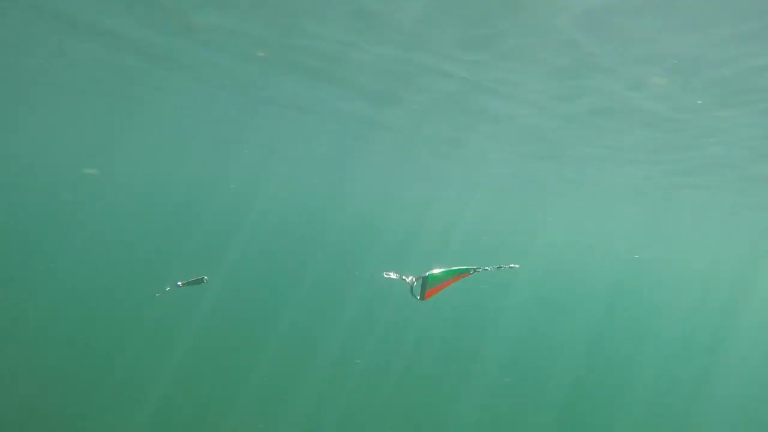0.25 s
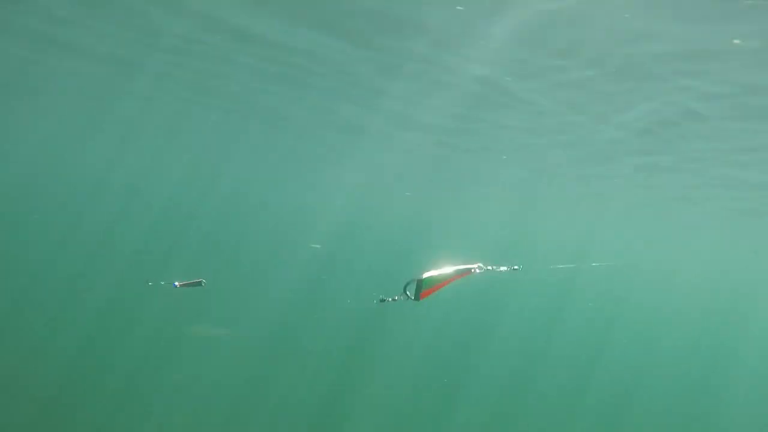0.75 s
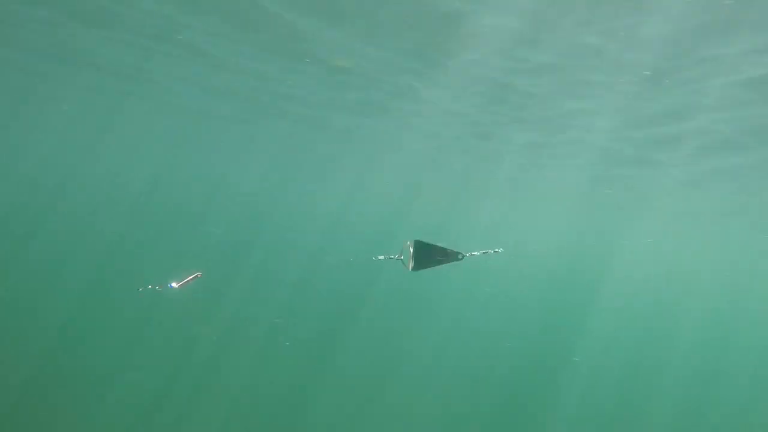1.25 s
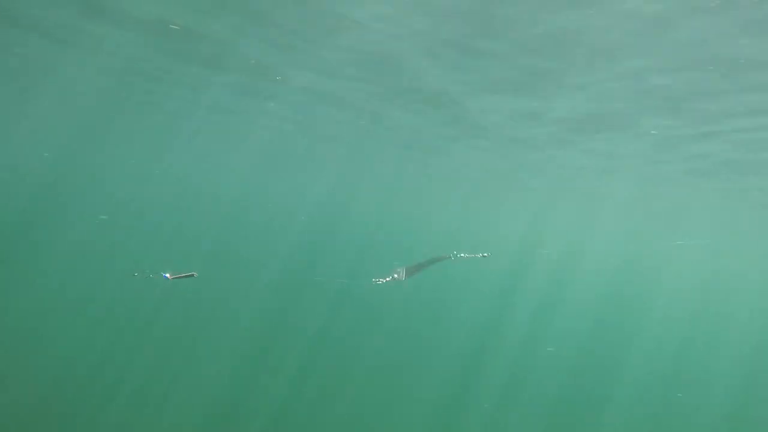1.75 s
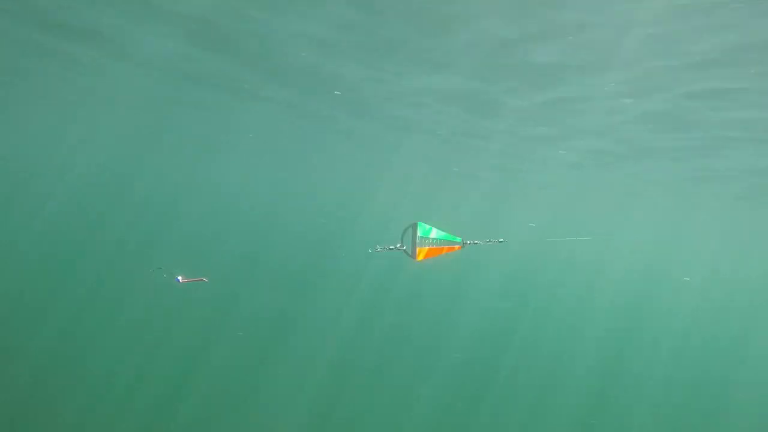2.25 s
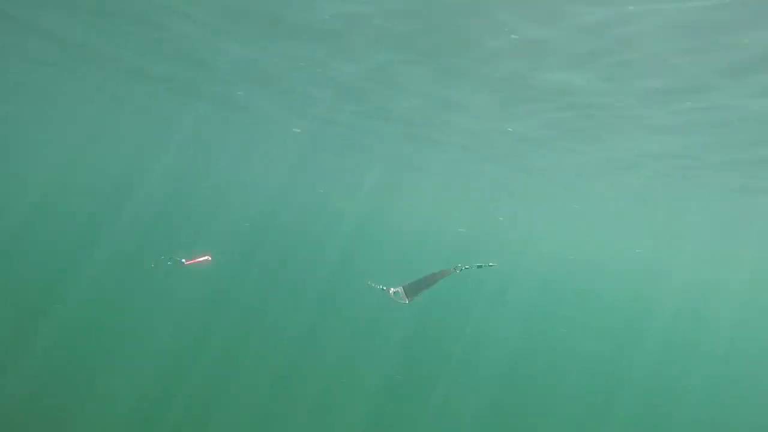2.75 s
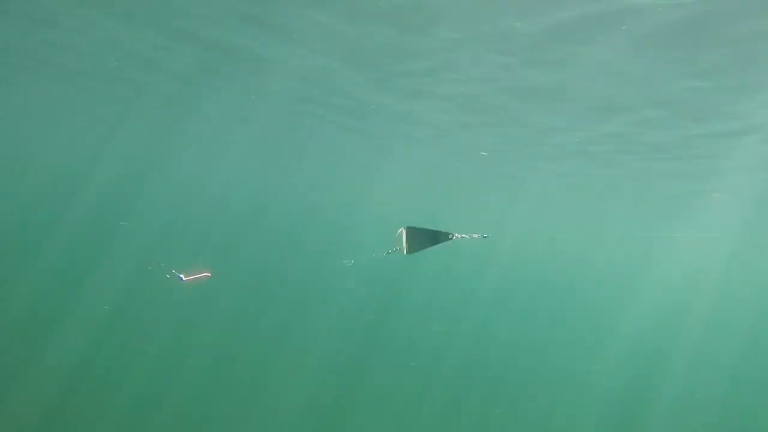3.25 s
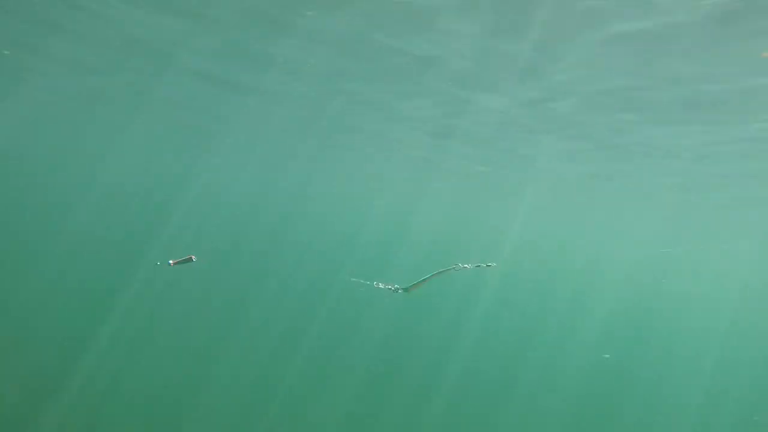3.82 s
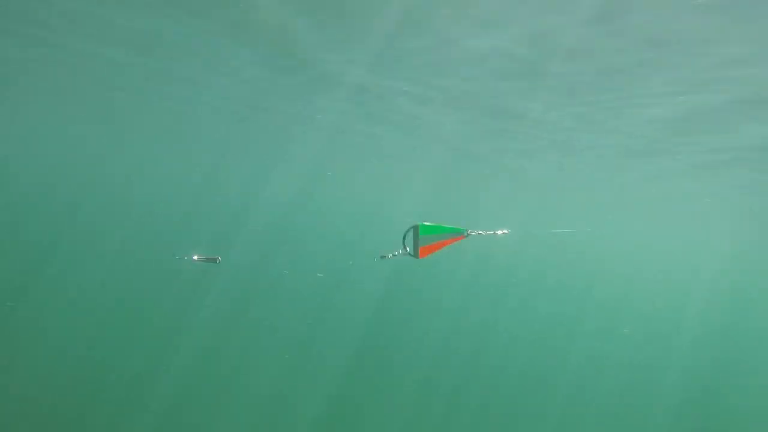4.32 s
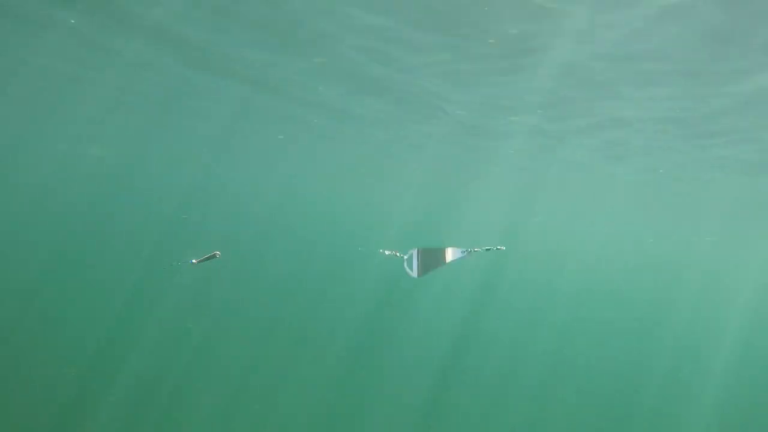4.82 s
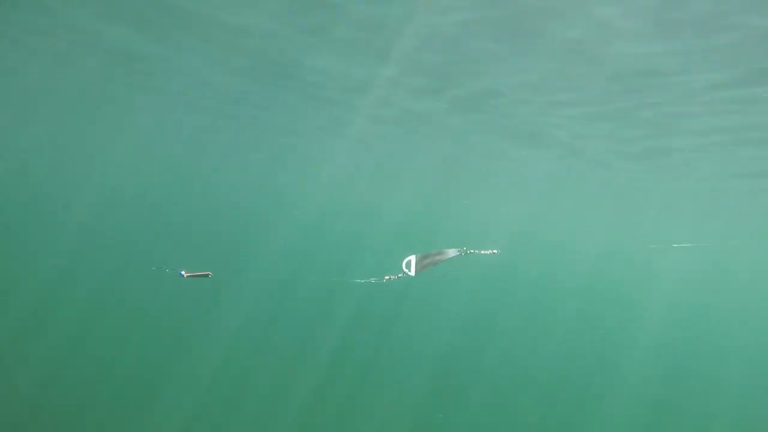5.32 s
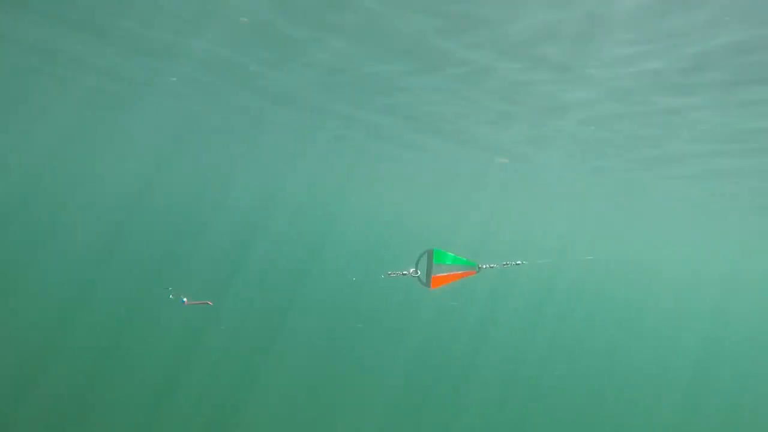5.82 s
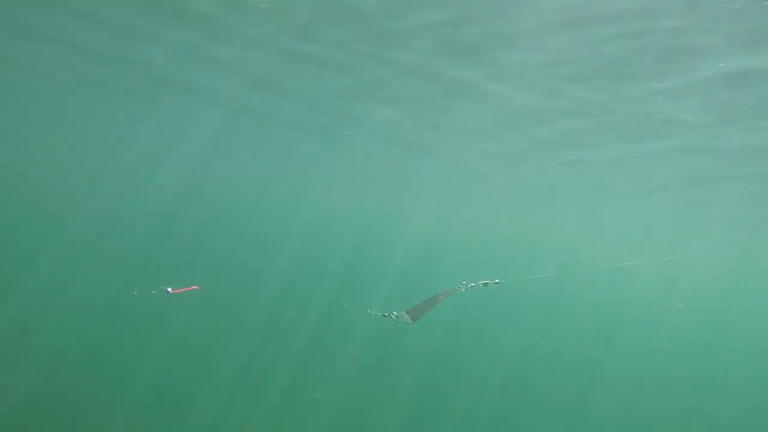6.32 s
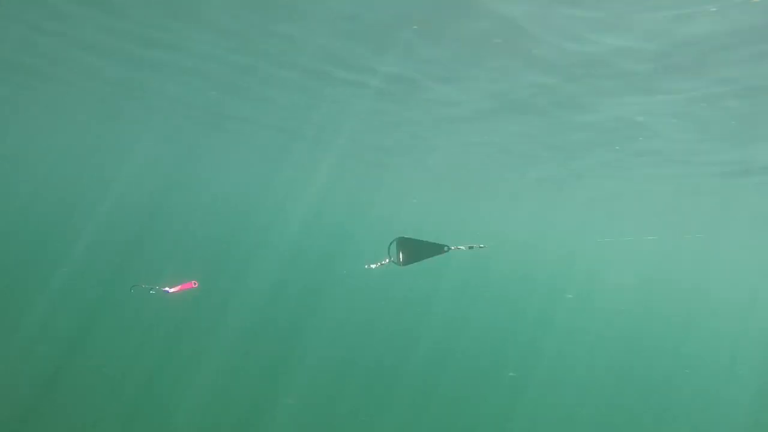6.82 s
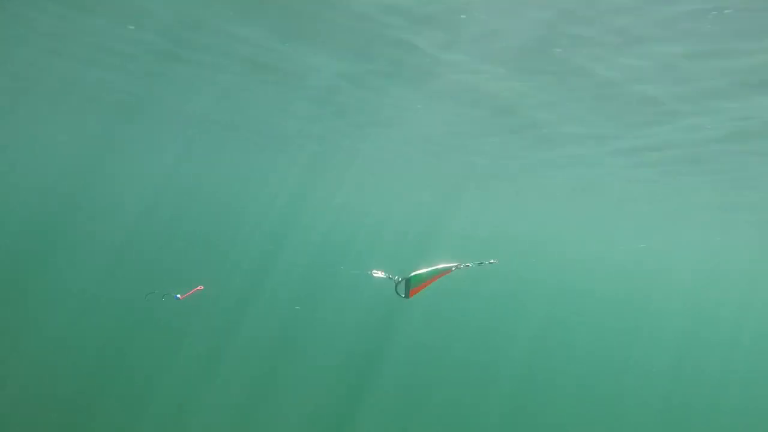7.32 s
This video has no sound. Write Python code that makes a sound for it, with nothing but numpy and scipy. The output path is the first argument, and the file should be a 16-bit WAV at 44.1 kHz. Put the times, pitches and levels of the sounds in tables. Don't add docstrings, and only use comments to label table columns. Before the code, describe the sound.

Heard underwater, a towed lure rig rumbles and thuds through the water while bubbles ring, gurgle and tick around a sealed camera case.

```python
import sys
import numpy as np
from scipy import signal
from scipy.fft import rfft
from scipy.io import wavfile
from scipy.ndimage import uniform_filter1d

SR = 44100
rng = np.random.default_rng(int(sys.argv[2]) if len(sys.argv) > 2 else 0)


def generate_wav(sig):
    pcm = np.round(np.clip(np.atleast_2d(sig).T, -1, 1) * 32767).astype(np.int16)
    wavfile.write(sys.argv[1], SR, pcm)


def ratio_of_db(decibels):
    return 10 ** (np.asarray(decibels, float) / 20)


N = 333837
TIME = np.arange(N) / SR

# (time [s], peak level [dB], pitch [Hz])
JERKS = [(0.247, -10.5, 199), (0.388, -10.5, 110.6), (0.44, -6, 171), (0.581, -14, 164),
         (0.751, -15, 134.5), (0.9, -7.5, 157), (0.928, -1.5, 124), (1.135, -9.5, 163), (1.326, -10.5, 123),
         (1.391, -14.5, 175), (1.49, -6.5, 113), (1.97, -6, 172), (2.101, -22, 73), (2.105, -2, 194),
         (2.728, -16, 113), (2.83, -11, 187), (2.881, -11, 193), (3.562, -10.5, 142.6), (3.791, -10.5, 132),
         (3.909, -10.5, 185), (3.96, -12, 180), (4.0, -12, 160), (0.06, -13, 190), (6.45, -13, 110),
         (4.174, -2.5, 127), (4.253, 0, 122), (4.999, -4, 102.3), (5.313, -10, 100), (5.452, -2.5, 150.1),
         (5.48, 1, 173.3), (6.068, -14, 113), (6.203, -12, 124.5), (6.641, -10, 139), (6.898, -12.5, 116),
         (0.33, -14, 120), (1.203, -8, 118.3), (1.714, -15, 113), (1.861, -19, 100), (2.339, -25, 138),
         (2.451, -8.5, 174), (2.539, -12, 161), (3.331, -12, 151.4), (4.682, -15.5, 197), (6.004, -14, 167),
         (6.255, -15.5, 112), (6.325, -17, 174), (6.56, -15.5, 155), (6.69, -8, 150), (6.982, -11.5, 169),
         (7.285, -13.5, 174), (7.352, -19, 108)]
# (pitch [Hz], width [Hz], level [dB])
SHELL = [(340.5, 35, 6.5), (474.7, 53, -1.5), (590, 170, -19), (797, 47, -6.5), (1008, 213, -3),
         (1314, 250, -1), (1523, 189, -2), (1887, 159, -5.5), (2150, 139, -5.5), (2422, 157, -5),
         (3420, 450, -25), (3830, 304, -22.5), (5220, 400, -25.5), (7050, 2800, -29.5), (10700, 33000, -35)]
# (time [s], level [dB])
FAR = [
    (0.0, -77.5),
    (0.82, -75),
    (1.75, -76),
    (4.24, -75),
    (4.321, -81),
    (4.45, -85),
    (5.2, -76),
    (7.57, -75),
]


def rms_one(x):
    return x / np.sqrt(np.mean(x ** 2) + 1e-20)


def in_time(rows):
    s, *columns = np.transpose(rows)
    return [np.interp(TIME, s, column) for column in columns]


def drift(rate_hz):
    r = np.exp(-80 * np.pi * rate_hz / SR)
    noise = rng.standard_normal(N // 40 + 2002)
    slow = signal.lfilter([1], [1, -2 * r, r * r], noise)[2000:]
    return np.interp(np.arange(N) / 40, np.arange(len(slow)), rms_one(slow - slow.mean()))


def band(x, low_hz, high_hz):
    return signal.sosfilt(signal.butter(2, [low_hz, high_hz], "band", fs=SR, output="sos"), x)


def resonance(hz, width_hz):
    r = np.exp(-np.pi * width_hz / SR)
    return (1 - r * r) / 2 * np.array([1, 0, -1]), [1, -2 * r * np.cos(2 * np.pi * hz / SR), r * r]


def body(x, modes):
    out = 0
    for k, (hz, width_hz, db) in enumerate(modes):
        out = out + (-1) ** k * ratio_of_db(db) * signal.lfilter(*resonance(hz, width_hz), x)
    return out


def shell_gain(hz):
    click = np.zeros(4096)
    click[0] = 1
    power = uniform_filter1d(np.abs(rfft(body(click, SHELL))) ** 2, size=15)
    return np.sqrt(np.interp(hz, np.arange(len(power)) * SR / 4096, power))


def add_ring(out, s, height, hz, t60_s, rise_cycles, glide):
    t = np.arange(int((t60_s + rise_cycles / hz) * SR)) / SR
    shape = (1 - np.exp(-t * hz / rise_cycles)) ** 2 * ratio_of_db(-60 * t / t60_s)
    wave = shape / shape.max() * np.sin(2 * np.pi * hz * t * (1 + glide * t / t60_s))
    i = int(s * SR)
    out[i:i + len(t)] += height * wave[:N - i]


def dying_noise(events, t60_s):
    kicks = np.zeros(N)
    np.add.at(kicks, [int(row[0] * SR) for row in events], ratio_of_db(2 * np.array(events)[:, 1]))
    power = signal.lfilter([1], [1, -ratio_of_db(-120 / (t60_s * SR))], kicks)
    return np.sqrt(power) * rng.standard_normal(N)


def crowd(per_s, spread_db, low_hz, high_hz, width, clumps, count):
    sizes = ratio_of_db(spread_db * np.minimum(rng.exponential(1, N), 4)) * rng.choice([-1, 1], N)
    born = rng.random(N) < per_s * clumps / SR
    dealt = rng.integers(0, count, N)
    rings = 0
    for k, hz in enumerate(np.geomspace(low_hz, high_hz, count)):
        struck = sizes * born * (dealt == k) + 1e-18
        soft = signal.lfilter(*resonance(hz, 0.12 * hz), struck)
        rings = rings + signal.lfilter(*resonance(hz, width * hz), soft) / hz ** .5
    return rms_one(rings)


def swells(events, calm_db, rise_db_s, fall_db_s):
    power = ratio_of_db(2 * calm_db)
    for s, peak_db in events:
        below_db = np.maximum(rise_db_s * (s - TIME), fall_db_s * (TIME - s))
        power = power + ratio_of_db(2 * (peak_db - below_db))
    return 10 * np.log10(power)


def far_hiss(level_db):
    # (pitch [Hz], density [dB per Hz])
    spectrum = [(2500, -4.5), (3200, -14), (4200, -16), (5200, -11), (6500, -18), (9000, -15), (12500, -22),
                (15200, -20)]
    hz, db = np.transpose(spectrum)
    edges_hz = 2500 * 2 ** np.arange(0, 2.8, 1 / 3)
    white = rng.standard_normal((2, N))
    out = np.zeros(N)
    for k, (low_hz, high_hz) in enumerate(zip(edges_hz, edges_hz[1:])):
        band_db = np.interp(np.log(low_hz * high_hz) / 2, np.log(hz), db) + 1.2 * drift(8)
        out += ratio_of_db(band_db) * band(white[k % 2], low_hz, high_hz)
    return ratio_of_db(level_db + 5.0) * out / np.std(band(out, 8900, 14600))


def pump(far_db):
    strokes_s = [0.31, 0.655, 1.012, 1.367, 1.694, 2.04, 2.407, 2.755, 3.112, 3.462, 3.804, 4.168, 4.532,
                 4.888, 5.24, 5.595, 5.959, 6.317, 6.662, 7.004, 7.389]
    # (pitch [Hz], width [Hz], level out [dB], level back [dB])
    valves = [
        (2980, 25, 2, 6),
        (6980, 70, -12, -11),
        (9810, 90, -5, -5),
        (12030, 70, -6, -9),
        (12770, 150, -1, -4),
        (13070, 50, -3, 0),
        (14570, 90, -22, -10),
    ]
    whistle_db, breath_db, spread_db = (13.5, 15), 14, 1.1
    tones = []
    for hz, width_hz, *_ in valves:
        leak = band(rng.standard_normal(N), .9 * hz, 1.1 * hz)
        tones.append(rms_one(signal.lfilter(*resonance(hz, width_hz), leak)))
    breath = rms_one(band(rng.standard_normal(N), 8400, 9700))
    spray = rms_one(band(rng.standard_normal(N), 8600, 18000))
    luck = ratio_of_db(spread_db * rng.standard_normal(len(strokes_s)))
    out = np.zeros(N)
    for k, s in enumerate(strokes_s):
        back = k % 2
        span = slice(int((s - .12) * SR), min(N, int((s + .12) * SR)))
        stroke_db = np.interp(TIME[span] - s, [-.105, -.075, -.04, -.017, .013, .035, .07],
                              [-40, -12, -8, 0, 0, -8, -35])
        whistle = ratio_of_db(-6) * spray[span]
        for valve, tone in zip(valves, tones):
            whistle = whistle + ratio_of_db(valve[2 + back]) * tone[span]
        leak = luck[k] * ratio_of_db(whistle_db[back]) * whistle
        if not back:
            leak = leak + ratio_of_db(breath_db) * breath[span]
        out[span] += ratio_of_db(stroke_db) * leak
    return ratio_of_db(far_db) * out


def pocket(surge_db):
    # (time [s], pitch [Hz])
    pitch = [
        (0, 540),
        (.5, 600),
        (1.1, 620),
        (1.35, 478),
        (3.4, 480),
        (3.55, 600),
        (7.57, 560),
    ]
    level_db, width_hz = -56, 39
    hz = in_time(pitch)[0]
    low_pass = signal.butter(2, width_hz, fs=SR, output="sos")
    sway = signal.sosfilt(low_pass, rng.standard_normal((2, N)))
    turn = 2 * np.pi * np.cumsum(hz * (1 + .06 * drift(5))) / SR
    murmur = rms_one(sway[0] * np.cos(turn) + sway[1] * np.sin(turn))
    return ratio_of_db(level_db + 0.9 * (surge_db + 44.5) + 5.0 * drift(11.0)) * murmur


def slosh(level_db):
    slaps_per_s, slap_db, slap_t60_s, spray_db = 24, -1.5, 0.046, -44.5
    clumps = ratio_of_db(3 * drift(25))
    larger = crowd(700, 3.9, 620, 3000, .04, clumps, count=20)
    wash = rms_one(band(rng.standard_normal(N), 170, 5600)) * clumps ** .5
    when, size = rng.uniform(0, 1, (2, 200))[:, :int(slaps_per_s * N / SR)]
    slap_events = np.transpose([when * (N - 1) / SR, 14 * size])
    slaps = band(dying_noise(slap_events, slap_t60_s), 370, 7000)
    surge = larger + ratio_of_db(-11.5) * wash + ratio_of_db(slap_db) * rms_one(slaps)
    surge = ratio_of_db(level_db - 4.0) * surge / np.std(band(body(surge, SHELL), 690, 2800))
    fizz = crowd(300, 3.6, 3100, 12500, .035, clumps, count=16)
    grit = crowd(70, 4.0, 2800, 7500, .3, clumps, count=6)
    spray = rms_one(band(slaps + rms_one(wash) * np.std(slaps), 2340, 8400))
    fine = ratio_of_db(-35.5) * fizz + ratio_of_db(-37.5) * grit + ratio_of_db(spray_db) * spray
    return surge + ratio_of_db(0.49 * (level_db + 46)) * fine


def clear_bubbles():
    strays = [(0.0022, -21, 1036), (0.00207, -25, 2140), (.528, -25.5, 2070), (3.668, -19.5, 2290),
              (3.68, -29, 3880), (3.739, -29.5, 2370), (5.345, -27.5, 2360), (6.9, -28, 2170),
              (6.868, -27.5, 1780), (1.5, -31, 1240), (1.4, -30, 1300), (1.612, -35.5, 950),
              (1.3, -34, 1160), (1.862, -29.5, 890), (2.2, -35.5, 2720), (3.425, -30.5, 1170),
              (4.205, -24.5, 1260), (4.685, -39.5, 840), (5.396, -36, 616), (5.715, -30, 1180),
              (6.478, -32.5, 1170), (2.205, -35.5, 1050), (2.1, -31, 1500), (2.545, -34.5, 1300),
              (3.738, -31, 1200), (2.79, -30.5, 953), (2.949, -35, 1220), (7.248, -31, 1500),
              (2, -36, 2400), (2.636, -32, 1900), (4.9, -35, 2100), (4.6, -36, 2100), (4.335, -33, 2400),
              (4.595, -31.5, 1050), (3.548, -31, 1000), (3.805, -30, 950), (5.77, -33, 1470),
              (2.846, -23.5, 1080), (1.255, -34, 2260), (1.74, -39, 2370), (.488, -30.5, 1240),
              (7.097, -30, 1250), (7.155, -35, 2400), (2.45, -32, 330), (3.335, -30, 520),
              (7.351, -34, 478), (7.519, -26.5, 542), (6.983, -34.5, 714)]
    # (time [s], peak level [dB], pitch [Hz])
    glugs = [(2.68, -32.5, 444), (0.625, -33.5, 656), (0.752, -31.5, 580), (1.136, -23.5, 560),
             (1.389, -26, 518), (2.05, -26.5, 460), (2.417, -28, 524), (2.54, -33.5, 444),
             (3.932, -22, 643), (4.012, -30, 624), (4.166, -19.5, 396), (4.791, -31.5, 510),
             (3.505, -37, 680), (5.481, -29, 450), (5.852, -28.5, 481), (6.001, -26.5, 645),
             (6.105, -29.5, 573), (6.327, -20.5, 450), (6.557, -30, 590), (7.287, -35, 610)]
    # (time [s], peak level [dB], pitch [Hz])
    blips = [(0.307, -20.5, 980), (0.418, -30, 1430), (0.721, -25, 908), (0.751, -21, 1210),
             (0.898, -26.5, 1100), (1.135, -31, 1360), (1.171, -26.5, 1017), (1.256, -25.5, 987),
             (2.052, -12.5, 1258), (2.139, -31, 1590), (2.357, -29, 1224), (2.841, -21.5, 1450),
             (3.228, -31.5, 1110), (3.336, -27, 940), (3.519, -29, 1365), (3.656, -27, 1380),
             (3.9, -25, 1310), (3.942, -19.5, 1320), (4.174, -22, 1016), (4.973, -21.5, 1216),
             (5.536, -29, 1700), (5.641, -22, 1254), (5.966, -21.5, 1273), (6.001, -23.5, 1420),
             (6.295, -25, 1190), (6.669, -21, 905), (6.892, -20, 1285), (6.929, -20, 1140),
             (6.973, -20, 1470), (7.313, -23, 1106)]
    # (time [s], peak level [dB], pitch [Hz])
    plinks = [(0.0581, -30, 2300), (0.21, -39, 2000), (0.4207, -20, 2480), (0.4928, -28.5, 2810),
              (0.9283, -29, 2290), (1.136, -29, 2030), (1.216, -33, 2270), (1.8612, -16.5, 2280),
              (2.0762, -21.5, 2304), (2.139, -29, 2150), (3.04, -34, 1990), (3.8372, -29.5, 2390),
              (3.901, -26, 2280), (4.165, -27.5, 2150), (4.226, -25, 2435), (4.282, -33, 2480),
              (4.591, -32.5, 2030), (5.117, -29, 2495), (5.6113, -24, 2170), (5.7131, -27.5, 1980),
              (5.969, -28.5, 1790), (6.093, -30.5, 2970), (6.171, -28, 2150), (6.448, -27, 2640),
              (6.5147, -19.5, 2420), (6.5824, -32, 2380), (6.646, -20, 2384), (7.098, -29, 2320),
              (7.2473, -26.5, 2700), (7.351, -21.5, 2390)]
    # (time [s], peak level [dB], pitch [Hz])
    ticks = [(0.0583, -22.5, 3380), (0.487, -36, 3900), (0.6622, -36, 3640), (0.8544, -38, 3900),
             (0.9373, -39.5, 3730), (1.5638, -31, 3860), (1.7427, -37, 3370), (2.2667, -40, 3427),
             (2.357, -36, 3730), (2.4907, -35.5, 3100), (2.8434, -31.5, 3650), (3.6581, -37.5, 3420),
             (4.1695, -38, 3420), (4.2476, -37.5, 3300), (4.958, -33.5, 3830), (4.774, -40.5, 3780),
             (6.1703, -36.5, 3700), (6.4205, -35.5, 3830), (6.6707, -36.5, 3570), (6.786, -38, 3320),
             (6.9706, -32.5, 3700), (7.2469, -39, 3370)]
    # (time [s], peak level [dB], pitch [Hz])
    pricks = [(0.8894, -38.5, 5400), (1.068, -40, 5200), (1.276, -41.5, 9900), (1.391, -35.5, 5330),
              (1.5472, -40, 5070), (1.9896, -40, 5400), (2.223, -37.5, 5120), (2.344, -40, 5000),
              (2.807, -39.5, 4940), (2.965, -43, 7240), (3.5876, -42, 5750), (3.66, -35, 7160),
              (3.975, -33, 4550), (5.001, -41, 4330), (6.031, -41, 4980), (6.3583, -41.5, 4840),
              (6.613, -38, 5030), (6.905, -39.5, 5200), (6.946, -36, 5180), (7.04, -40, 4950)]
    # (time [s], peak level [dB], pitch [Hz])
    burbles = [(0.06, -30, 972), (0.2277, -27, 2340), (0.441, -29, 2400), (0.4723, -33, 2180),
               (0.545, -33.5, 2570), (0.571, -31, 1580), (0.655, -30, 1740), (0.6624, -29, 2390.0),
               (0.87, -34, 2095.0), (0.897, -27, 1600), (0.96, -33, 2310), (1.3358, -36, 2870),
               (1.579, -34, 1730), (1.519, -32, 2370), (2.22, -33, 2690), (2.265, -30.5, 1580),
               (2.357, -40, 2800), (2.397, -33, 2540), (2.4929, -32, 1440), (2.6161, -34.5, 1950),
               (2.7007, -36, 2760), (2.8026, -37, 2830), (2.888, -27, 1166), (3.1127, -32, 2570),
               (3.319, -36, 2680), (3.677, -28.3, 1261.0), (3.7056, -34, 2130), (3.7055, -32.5, 2700),
               (4.49, -39.5, 2560), (3.9042, -36, 2740), (3.9743, -31, 2347.0), (3.994, -31, 1760),
               (4.074, -37, 2600), (4.0944, -29.5, 940), (4.1654, -32, 676), (4.171, -25, 1360),
               (4.2511, -32, 2764.0), (4.974, -30, 2360), (5.1225, -30.5, 2190), (5.3131, -37, 2560),
               (5.365, -28, 2190), (5.371, -30, 2457.0), (5.38, -25, 1092), (5.4329, -31.5, 796),
               (5.4344, -32, 1930.0), (5.093, -34, 594), (5.608, -33, 1670), (1.878, -29, 1790),
               (6.095, -28.5, 2900), (6.1056, -30.5, 1400), (6.2623, -29.5, 1870), (6.343, -32, 1800),
               (6.5564, -28, 1481.0), (6.7177, -37, 1480), (6.801, -35, 2848.0), (6.9528, -28, 2300),
               (6.9824, -25.5, 1920), (7.0259, -28.5, 2457.0), (7.1, -32.5, 1650)]
    # (time [s], peak level [dB], pitch [Hz])
    crackle = [(0.0943, -43, 3160), (0.4223, -38, 3820), (0.655, -41, 5300), (0.8613, -45.5, 5047.0),
               (1.151, -41, 4800), (1.357, -41.5, 3430), (1.9771, -42, 3800), (2.078, -44, 3180),
               (2.4775, -45, 6263.0), (2.7693, -46, 5086.0), (2.878, -42, 10000), (3.0659, -42, 3900),
               (3.546, -44, 4286.0), (4.637, -42.5, 5230), (3.6589, -44, 4900), (3.69, -41, 5256.0),
               (3.955, -43.5, 6068.0), (4.1066, -39, 5345.0), (5.082, -46, 4450), (4.535, -42.5, 5300),
               (5.4326, -43, 4700), (5.4335, -41, 5900), (6.3097, -39, 3930), (6.6767, -39, 6263.0),
               (6.7, -37, 5427.0), (6.8, -36.5, 3049.0), (6.9713, -45, 5198.0), (7.005, -40, 3793.0),
               (7.0415, -36, 2960), (7.0798, -38, 3830), (7.186, -41, 7200)]
    # (time [s], pitch [Hz], level [dB])
    gurgle = [
        (6.648, 388, -23),
        (6.664, 510, -27),
        (6.68, 563, -22),
        (6.696, 600, -18.5),
        (6.71, 590, -37),
        (6.724, 610, -37),
        (6.74, 690, -66),
    ]

    breaking = glugs + blips + plinks + burbles
    splash = ratio_of_db(4.5) * dying_noise(breaking + strays, t60_s=0.061)
    splash = splash + ratio_of_db(-20.5) * dying_noise(JERKS, t60_s=0.058)
    splash = splash + ratio_of_db(12) * dying_noise(breaking, t60_s=0.0051)
    fine_splash = dying_noise(ticks + pricks + crackle, t60_s=0.0061)
    out = band(splash, 290, 5200) + ratio_of_db(26.0) * band(fine_splash, 1700, 9000)
    for bubbles, cycles in ((strays, 30), (glugs, 24), (blips, 26), (plinks, 42), (ticks, 36), (pricks, 40),
                            (burbles, 28), (crackle, 30)):
        luck = rng.uniform(0.417, 2.43, (len(bubbles), 3))
        for (s, peak_db, hz), (long, slide, later) in zip(bubbles, luck):
            height = ratio_of_db(peak_db + 1.0) / shell_gain(hz)
            t60_s = long * cycles / max(hz, 600)
            add_ring(out, s - .0015, height, hz, t60_s, 2.2, 0.039 * slide)
            add_ring(out, s + later * 12 / hz, height * ratio_of_db(-12.0), hz * (.9 + 0.116 * slide), t60_s, 2.2, .05)
    hz, level_db = in_time(gurgle)
    sounding = (TIME > gurgle[0][0]) & (TIME < gurgle[-1][0])
    return out + sounding * ratio_of_db(level_db) / shell_gain(hz) * np.sin(2 * np.pi * np.cumsum(hz) / SR)


def buffeting(level_db):
    # (time [s], peak level [dB], pitch [Hz])
    shoves = [(0.364, -10, 32.5), (0.79, -14, 56.5), (0.962, -7.5, 32.3), (1.518, -14, 52.5),
              (2.448, -12, 65), (2.647, -20, 53.8), (4.168, -10, 40.8), (4.761, -8, 32.3),
              (4.963, -12, 62.5), (6.109, -13, 38), (6.452, -11, 35.2), (6.903, -10, 59.2)]
    heave = band(rng.standard_normal(N + SR), 11, 19)[SR:]
    push = band(rng.standard_normal(N + SR), 25, 47)[SR:] * ratio_of_db(1.2 * drift(12))
    out = ratio_of_db(level_db) * (rms_one(heave) * ratio_of_db(-1) + rms_one(push) * ratio_of_db(-2.0))
    for s, peak_db, hz in shoves:
        add_ring(out, s, ratio_of_db(peak_db - 2.5), hz, 5.8 / hz, rise_cycles=0.47, glide=-0.05)
    return out


def shaking(level_db):
    # (pitch [Hz], width [Hz], level [dB])
    sway_modes = [
        (113, 19.9, -1.5),
        (163, 38, 0),
        (187, 61.2, -2),
    ]
    eddies = rng.standard_normal(N) * ratio_of_db(3.22 * drift(26.4))
    out = ratio_of_db(level_db - 0.48) * rms_one(band(body(eddies, sway_modes), 72, 230.0))
    for s, peak_db, hz in JERKS:
        other_hz = 0.467 * hz if hz > 150 else 1.575 * hz
        add_ring(out, s - .004, ratio_of_db(peak_db - 1.5), hz, 12 / hz, rise_cycles=0.52, glide=-0.042)
        add_ring(out, s + 0.0047, ratio_of_db(peak_db - 8.5), other_hz, .1, rise_cycles=0.54, glide=-0.01)
        add_ring(out, s + 0.00726, ratio_of_db(2.6 * peak_db - 14), 640, .016, rise_cycles=0.3, glide=-0.73)
    return out


def scene():
    # (time [s], level
    # [dB])
    tow = [(0.0, -18), (0.21, -21), (0.6, -18.5), (0.94, -17), (1.02, -18.5), (1.12, -23), (1.9, -16),
           (2.3, -17.5), (2.64, -17.5), (3.67, -16.5), (3.87, -18.5), (4.18, -14.5), (4.38, -27),
           (4.74, -21.5), (5.13, -22.5), (5.47, -16.5), (7.0, -18), (7.57, -15.5)]
    # (time [s], level [dB])
    shudders = [(0.1, -18.5), (0.43, -14.5), (0.65, -19), (0.94, -40), (1.22, -21), (1.53, -19),
                (2.12, -14.5), (2.45, -19.5), (2.78, -18.5), (3.2, -19.5), (3.65, -18.5), (4.02, -20),
                (4.25, -35), (4.74, -23), (5.01, -17), (5.45, -18.5), (5.9, -18.5), (6.33, -17),
                (6.68, -20), (7.03, -21), (7.35, -21)]
    # (time [s], level [dB])
    surges = [(0.0, -31.5), (0.31, -40), (0.54, -38), (0.72, -38.5), (0.94, -38.5), (1.06, -46), (1.2, -38),
              (1.57, -41.5), (1.88, -41), (2.04, -45), (2.28, -41), (2.48, -39.5), (2.65, -38),
              (2.83, -35.5), (3.07, -37), (3.35, -38.5), (3.55, -39), (3.68, -31), (3.95, -26.5),
              (4.24, -33), (4.33, -40.5), (4.5, -43.5), (4.62, -38.5), (4.97, -33), (5.12, -39.5),
              (5.38, -32.5), (5.64, -37.5), (5.98, -39), (6.31, -31), (6.68, -32), (6.93, -29), (7.35, -34)]
    buffet_db, far_db = in_time(tow)[0], in_time(FAR)[0]
    shake_db = swells(shudders, buffet_db - 8.5, rise_db_s=85.5, fall_db_s=111)
    surge_db = swells(surges, .5 * far_db - 8, rise_db_s=126, fall_db_s=132)
    outside = clear_bubbles() + slosh(surge_db)
    motion = buffeting(buffet_db) + shaking(shake_db)
    duck_from, duck_db, duck_s = .55, 120, .035
    hold = np.exp(-1 / (duck_s * SR))
    excess = signal.lfilter([1 - hold], [1, -hold], np.maximum(np.abs(motion) - duck_from, 0))
    heard = ratio_of_db(-duck_db * excess) * body(outside, SHELL)
    mix = motion + heard + far_hiss(far_db) + pump(far_db) + pocket(surge_db)
    dip = signal.lfilter(*resonance(400, 60), mix)
    return (mix - 0.81 * dip)[None]


def treble_gate(x, edge_db, slope_db_khz, mood_db, chance_db):
    size, width_hz = 1536, 280
    hz, _, frames = signal.stft(np.pad(x, (0, 3072), "reflect"), SR, nperseg=size)
    count = frames.shape[-1]
    gain_db = np.interp(np.arange(count) * (size // 2) / SR, *np.transpose(FAR)) - FAR[2][1]
    mood = gain_db + mood_db * rng.standard_normal(count)
    frames[hz > 15400] = 0
    for low_hz in np.arange(10400, 16000, width_hz):
        rows = (hz >= low_hz) & (hz < low_hz + width_hz)
        level_db = 10 * np.log10(np.mean(np.abs(frames[rows]) ** 2, axis=0) + 1e-20)
        need_db = edge_db + slope_db_khz * (low_hz - 14000) / 1000 + mood
        need_db = need_db + chance_db * rng.standard_normal(count)
        frames[rows] *= np.where(level_db > need_db, 1, ratio_of_db(-28))
    return signal.istft(frames, SR, nperseg=size)[1][:N]


def band_limit(x):
    return signal.sosfilt(signal.butter(12, 15180, fs=SR, output="sos"), x)


def record(dry):
    held = dry / (1 + np.abs(dry / .95) ** 6) ** (1 / 6)
    held = held * np.minimum(1, (TIME[-1] - TIME) / .004)
    gated = treble_gate(held[0], edge_db=-99.8, slope_db_khz=4.2, mood_db=3, chance_db=4)
    return band_limit(gated[None])


dry = scene()
out = record(dry)
generate_wav(out)
```